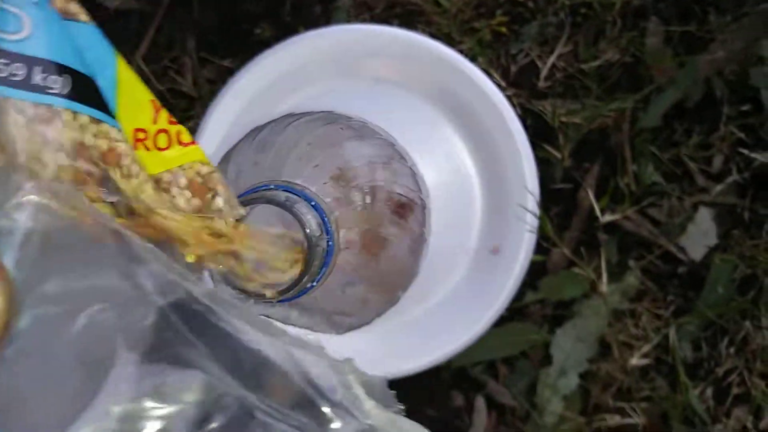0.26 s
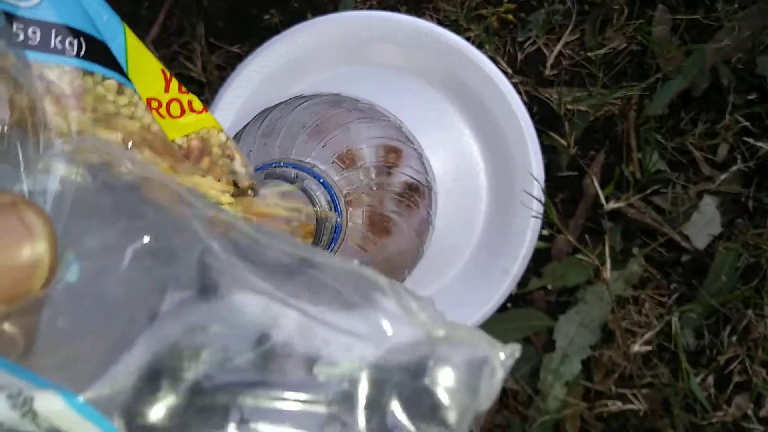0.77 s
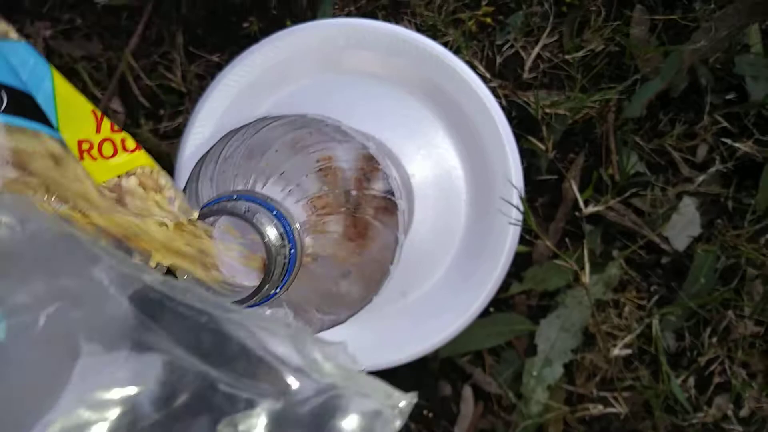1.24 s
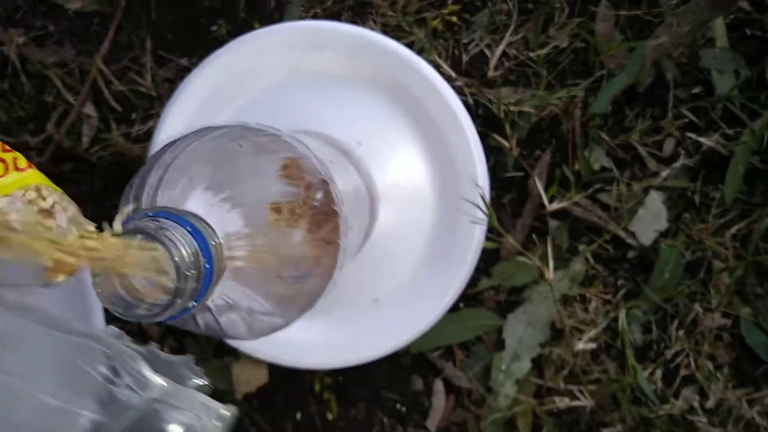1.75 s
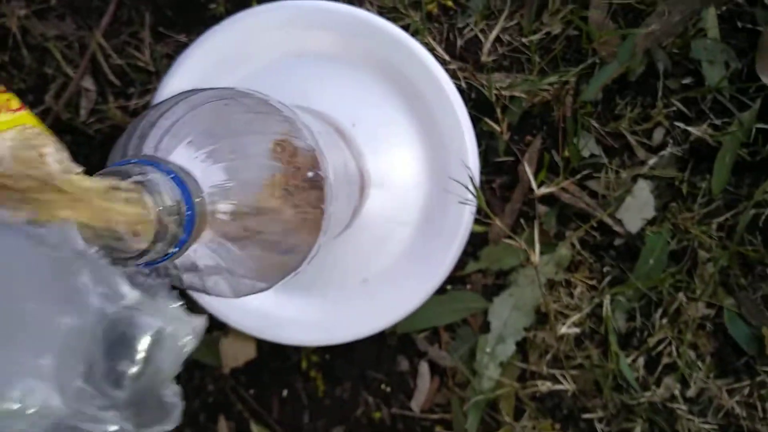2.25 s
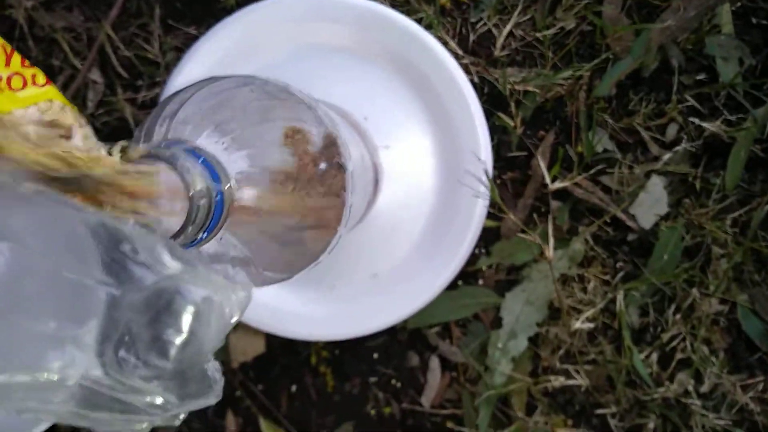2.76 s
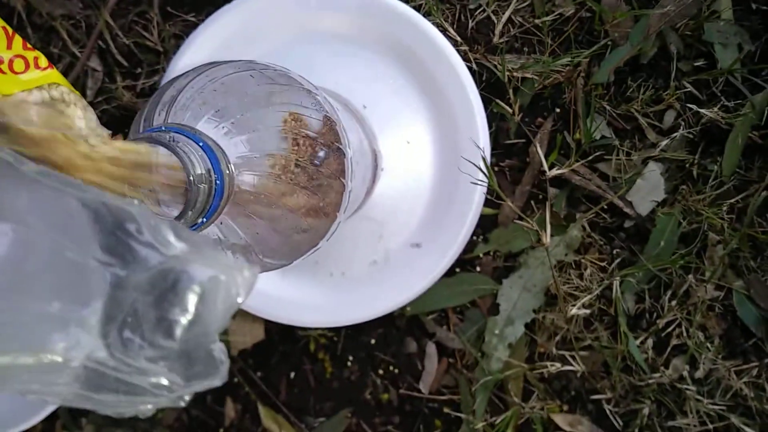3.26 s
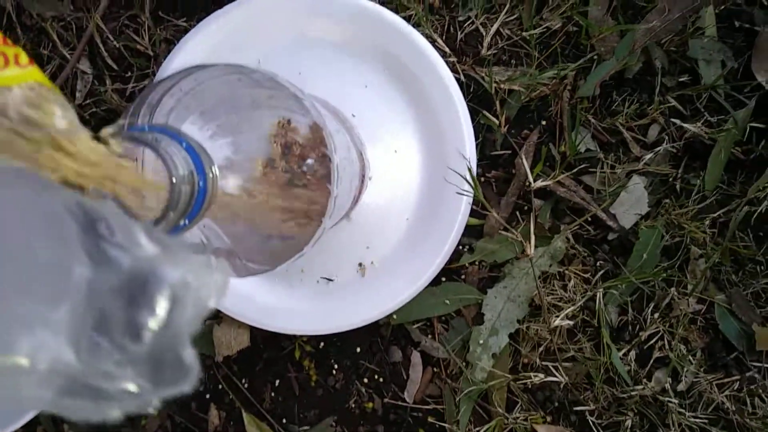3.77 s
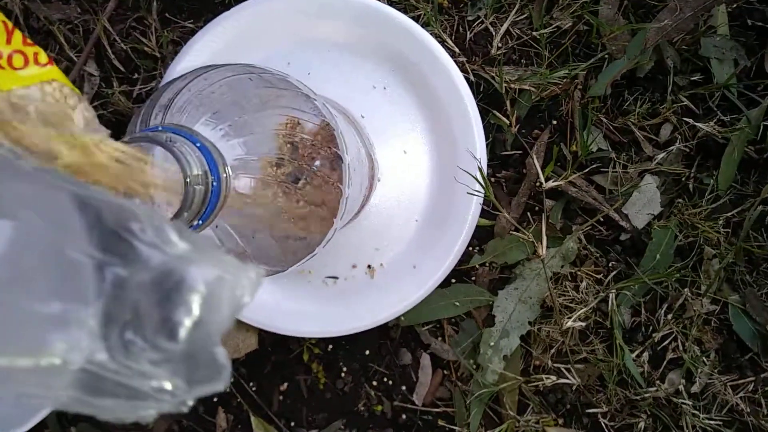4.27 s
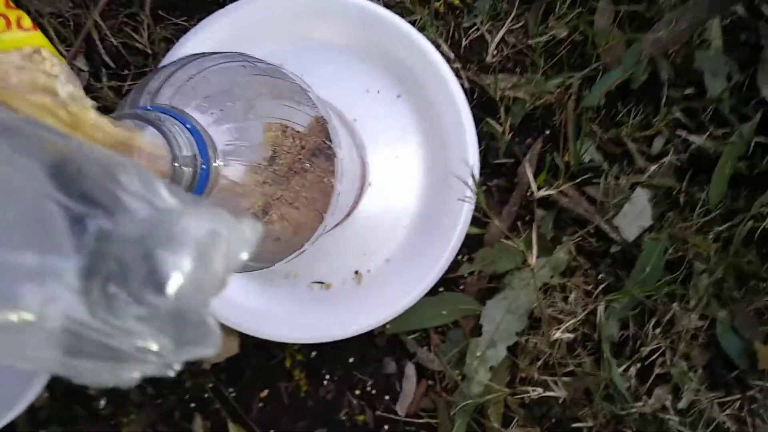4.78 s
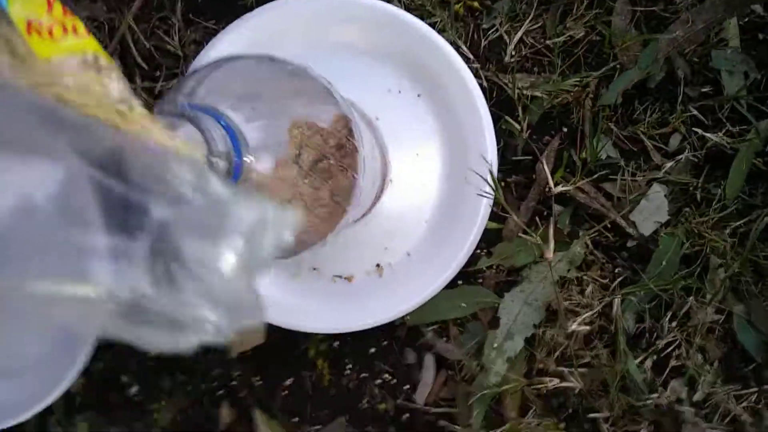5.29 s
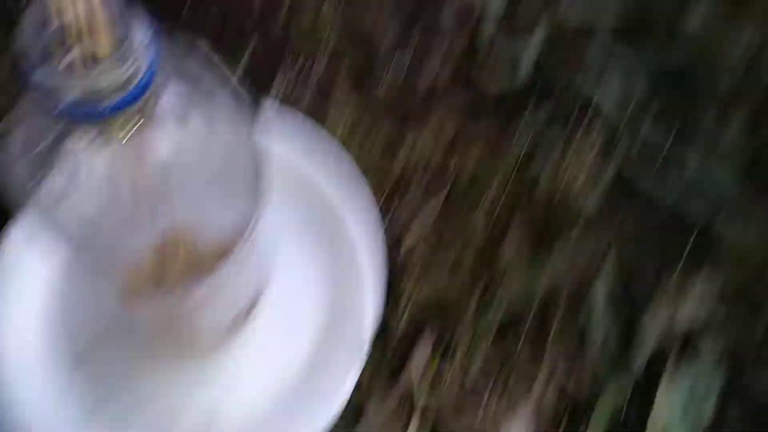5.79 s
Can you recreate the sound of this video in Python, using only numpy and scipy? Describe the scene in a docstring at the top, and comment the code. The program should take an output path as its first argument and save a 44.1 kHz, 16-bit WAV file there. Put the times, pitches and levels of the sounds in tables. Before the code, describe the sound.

Dry birdseed streams into a plastic bottle with a bright, dense, crackling rattle, dulling and thinning as the seed bed deepens outdoors.

```python
"""Outdoors, the microphone close to a plastic bottle as dry birdseed pours in through its neck for six seconds.
From the start, noise bursts coloured by the plastic make the ticking stream, over a bright rustle and a yard background.
Under it a low sine drone wavers far off, and resonances driven by noise make the bottle's air boom softly.
Larger seeds soon stand out, and a hollow knock of decaying sines comes just after one second.
As the bed of seed builds up the ticks dull and thin; throughout, the recorder limits the loudest ones."""
import sys
import numpy as np
from scipy import signal
from scipy.fft import rfft, irfft
from scipy.io import wavfile
from scipy.ndimage import uniform_filter1d, minimum_filter1d

SR = 44100
rng = np.random.default_rng(int(sys.argv[2]) if len(sys.argv) > 2 else 0)


def store_pcm(level_fs):
    """Save levels as 16-bit WAV."""
    pcm = np.round(np.clip(level_fs, -1, 1) * 32767).astype(np.int16)
    wavfile.write(sys.argv[1], SR, np.atleast_2d(pcm).T)


N = 265746  # samples


def gain_of(db):
    """Decibels to gain."""
    return 10 ** (np.asarray(db) / 20)


def evened(x):
    """Scales to rms 1."""
    return x / np.sqrt(np.mean(x ** 2) + 1e-20)


def read(points, hz):
    """Reads a curve over frequency on a log-frequency axis."""
    point_hz, value = np.transpose(points)
    return np.interp(np.log(hz + 1), np.log(point_hz + 1), value)


def columns(rows):
    """Reads each column of a time table at every sample."""
    time_s, *rest = np.transpose(rows)
    return [np.interp(np.arange(N) / SR, time_s, column) for column in rest]


def coloured(points):
    """Steady noise of rms 1 with a given spectrum."""
    spectrum = rfft(rng.standard_normal(N))
    level_db = read(points, np.fft.rfftfreq(N, 1 / SR))
    return evened(irfft(spectrum * gain_of(level_db), N))


def resonate(x, hz, width):
    """Shifts the curve hz down to zero, smooths, and shifts back: a resonance of gain 1."""
    turn = np.exp(2j * np.pi * np.cumsum(hz * np.ones(len(x))) / SR)
    r = np.exp(-np.pi * width / SR)
    return 2 * (turn * signal.lfilter([1 - r], [1, -r], x / turn)).real


def drift(seconds):
    """Slow chance of rms 1 that changes over about this time."""
    width = round(seconds * SR)
    return evened(uniform_filter1d(uniform_filter1d(rng.standard_normal(N), width), width))


# seed bed building up in the bottle: time_s, depth (0-1)
BED_DEPTH = [(0, 0), (1.5, 0.18), (2.5, 0.36), (3.5, 0.67), (4.5, .85), (6.03, 0.89)]


def bed_depth():
    """Depth of the seed bed, which moves the colour of each strike from bare plastic to seed on seed."""
    return columns(BED_DEPTH)[0]


# the stream of small seeds: time_s, level_db
STREAM_LEVEL = [(0, -22), (0.035, -20.5), (0.05, -11.5), (0.65, -13.5), (1.05, -16), (1.3, -13.5),
                (1.6, -16.5), (1.85, -13.5), (2.75, -12.5), (3.1, -12.5), (3.45, -18), (3.9, -15.5),
                (4.1, -20), (4.6, -21.5), (5.1, -23.5), (5.5, -26.5), (6.03, -25)]
# the stream stalls for a moment at the neck: middle_s, length_s, depth_db
STALLS = [(0.108, 0.041, -14), (0.214, 0.0076, -5), (0.742, 0.042, -8), (1.076, 0.048, -9.5),
          (1.137, 0.014, -17), (1.2, 0.014, -10), (1.472, 0.041, -6), (2.126, 0.01, -8.5),
          (2.281, 0.017, -9.5), (2.809, 0.094, -6), (2.972, 0.017, -6.5), (3.128, 0.033, -5.5),
          (3.856, 0.022, -3), (4.76, 0.046, -4), (4.963, 0.019, -6), (5.197, .02, -7), (5.3, 0.023, -3.5),
          (5.455, 0.014, -8)]


def flow_db():
    """Level of the stream, with a smooth dip at each stall."""
    t = np.arange(N) / SR
    dips_db = sum(db * np.exp(-(2 * (t - s) / length) ** 2) for s, length, db in STALLS)
    return columns(STREAM_LEVEL)[0] + dips_db


# colour of seeds on the bare plastic: pitch_hz, level_db (per Hz)
BARE_COLOUR = [(410, -29), (700, -17.5), (777, -18), (1340, -16.5), (1760, -6.5), (2060, -6.5), (3160, 0.5),
               (4260, 2.5), (5740, -9), (6370, -8), (9040, -10.5), (10800, -18), (12800, -22.5),
               (15600, -35.5)]
# colour of seeds on a bed of seed: pitch_hz, level_db (per Hz)
BEDDED_COLOUR = [(410, -64), (700, -28), (1150, -17.5), (1490, -14.5), (1670, -13.5), (1830, -9),
                 (2880, -7.5), (3550, -3), (4200, -1), (5740, -3), (8470, -14), (12300, -38.5),
                 (15600, -48)]
# bottle wall modes: pitch_hz, width_hz, bare_lift_db, bedded_lift_db
WALL_MODES = [(1456, 51, -1.5, 0), (1805, 170, 5.5, -4), (2518, 104, 3.5, -1.5), (3087, 370, 3.5, -0.5),
              (3546, 750, 3.5, 1), (3910, 160, -7, 5.5), (4000, 590, 3.5, -8), (4970, 400, -6.5, 1.5),
              (5220, 1200, 5, -6), (6260, 640, 3.5, -5.5), (7130, 2500, 1, -3.5), (15100, 1900, 16, -3)]
# how long a strike rings: pitch_hz, t60_s
RING_TIME = [(1000, 0.023), (2000, 0.051), (3500, 0.025), (7000, 0.013), (14000, 0.02)]
LENGTH, TICK_AT = 2048, 20  # samples: one strike, and its tick's peak within it


def strikes(bed, low_db, high_db, tick_db=14.0, spot_db=6.0):
    """One strike a row, peak 1: a tick, then a ring of the walls whose decay time depends on pitch."""
    noise = rng.standard_normal((len(bed), LENGTH + len(WALL_MODES)))
    ring, spot = noise[:, :LENGTH], noise[:, LENGTH:]
    crack = ring[:, ::-1]
    band_hz, t, z = signal.stft(ring, SR, nperseg=64)
    decay = gain_of(-60 * t / read(RING_TIME, band_hz)[:, None])
    ring = signal.istft(z * decay, SR, nperseg=64)[1][:, :LENGTH]
    n = np.arange(LENGTH)
    tick = crack * (n >= TICK_AT) * np.exp(-abs(n - TICK_AT) / (0.00045 * SR))  # the husk's brief crack
    ring = ring * np.minimum(n / 27.0, 1) + gain_of(tick_db) * tick  # a soft touch comes just before it

    hz = np.abs(np.fft.fftfreq(2 * LENGTH, 1 / SR))
    bed = np.clip(bed, 0, 1)[:, None]
    db = (1 - bed) * read(BARE_COLOUR, hz) + bed * read(BEDDED_COLOUR, hz)
    thud_band = 1 / (1 + (hz / 1850) ** 6 + (1020 / (hz + 1)) ** 6)
    bright_band = 1 / (1 + (6500 / (hz + 1)) ** 6 + (hz / 13000) ** 3)
    db = db + low_db[:, None] * thud_band + high_db[:, None] * bright_band
    # where the seed lands decides which modes it wakes
    for (mode_hz, width, bare_db, bed_db), luck in zip(WALL_MODES, spot.T):
        lift_db = (1 - bed) * bare_db + bed * bed_db + spot_db * luck[:, None]
        db = db + lift_db / (1 + (2 * (hz - mode_hz) / width) ** 2)
    # causal colour: nothing before the strike begins
    log_gain = signal.hilbert(np.maximum(db, -100) * np.log(10) / 20)
    spectrum = np.fft.fft(ring, 2 * LENGTH) * np.exp(np.conj(log_gain))
    sound = np.fft.ifft(spectrum).real[:, :LENGTH]
    return sound / abs(sound).max(1, keepdims=True)


SEEDS_PER_S, CLUMPING = 420, 0.6  # rate at average clumping; strength of clumping (natural log)
SIZE_SPREAD_DB, PATTER_DB = 1.5, -6  # dB: scale of the chance in seed size; patter against the seeds


def stream(count=32):
    """Many small seeds in loose clumps over a fine even patter; each strike suits the depth of the bed."""
    clumps = evened(uniform_filter1d(uniform_filter1d(rng.standard_normal(N), 250), 250))
    falls = rng.random(N) < SEEDS_PER_S * np.exp(CLUMPING * clumps) / SR
    size_db = SIZE_SPREAD_DB * np.minimum(rng.exponential(1, N), 2.6)
    size = falls * gain_of(size_db) * rng.choice([-1, 1], N)
    patter = rng.standard_normal(N) * (rng.random(N) < 0.15)  # husks and dust, too dense to count
    size = evened(size) + gain_of(PATTER_DB) * evened(patter)

    # strikes run from bare plastic to full bed; each seed picks one near the present depth
    pick = np.round(count * abs(bed_depth() + 0.16 * rng.standard_normal(N)))
    pick = np.clip(pick, 0, count - 1)
    low, high = rng.standard_normal((count, 2)).T
    bank = strikes(np.arange(count) / (count - 1), 2.6 * low, 3.6 * high)
    bank = bank / np.linalg.norm(bank, axis=1, keepdims=True)
    out = sum(signal.oaconvolve(size * (pick == k), strike)[:N] for k, strike in enumerate(bank))
    return gain_of(flow_db()) * evened(out)


def rustle(seeds):
    """Husks brushing past each other: a thin bright hiss that flickers and swells with the ticks."""
    busy = np.sqrt(abs(uniform_filter1d(seeds ** 2, size=130)))
    flicker = gain_of(-26.0 + 2.6 * drift(0.007))
    # pitch_hz, level_db (per Hz)
    hiss = coloured([(3000, -5), (7000, -24), (11000, -18), (13000, -10), (15000, 0.0)])
    return flicker * busy * hiss


# colour of the outdoor background: pitch_hz, level_db (per Hz)
YARD_COLOUR = [(88, -42), (150, -20), (210, -24), (292, -38), (429, -3.5), (567, 0), (655, -6), (1500, 8.5),
               (1950, -49), (3300, -120)]
# outdoor background: time_s, level_db
YARD_SWELL = [(0, -39.5), (0.45, -41), (1.2, -43), (3.1, -37.5), (3.9, -36.5), (4.5, -45), (5.25, -51),
              (5.5, -59), (5.75, -48), (6.03, -39)]


def yard():
    """The outdoor background: noise of a fixed colour that rises and falls in level."""
    return gain_of(columns(YARD_SWELL)[0]) * coloured(YARD_COLOUR)


# far drone: time_s, pitch_hz, tone_db, rumble_db
FAR_DRONE = [(0, 73.7, -42, -46), (0.47, 75.2, -35, -40), (1.14, 76.3, -45, -42), (1.27, 77.1, -56, -49),
             (1.66, 77.8, -67, -54), (1.76, 71.1, -46, -50), (2.01, 68.8, -35, -40),
             (2.18, 70, -47.5, -45.5), (2.7, 74.4, -48.5, -42), (3.3, 71.8, -46.5, -48.5),
             (3.6, 70.6, -64, -51), (3.94, 78, -45.5, -49), (4.13, 80, -75, -62), (4.28, 80, -49, -45.5),
             (4.77, 74.9, -50.5, -41), (4.86, 72.6, -61, -65), (5.0, 71.5, -43.5, -46),
             (5.36, 70.2, -60, -56), (5.5, 69.8, -46.5, -51), (6.03, 73, -57, -55)]
# colour of the rumble under it: pitch_hz, level_db (per Hz)
RUMBLE_COLOUR = [(15, -47), (25, -11), (40, -5), (59, -0.5), (75, 6), (123, 4), (165, -4), (195, -16),
                 (260, -26), (340, -39), (570, -120)]
DRONE_WAVER_DB, DRONE_WAVER_HZ = 4.0, 2.77  # rms waver of level and pitch where the tone is faint
OCTAVE_DB = -18  # dB, the drone's octave against its tone


def drone():
    """A far low tone, steady when loud and wavering when faint, over a rumble that comes and goes."""
    hz, tone_db, rumble_db = columns(FAR_DRONE)
    faint = np.clip((-39.0 - tone_db) / 8.2, 0, 1)
    turn = 2 * np.pi * np.cumsum(hz + faint * DRONE_WAVER_HZ * drift(0.071)) / SR
    tone = np.sqrt(2) * (np.sin(turn) + gain_of(OCTAVE_DB) * np.sin(2 * turn))
    tone_gain = gain_of(tone_db + faint * DRONE_WAVER_DB * drift(0.05))
    return tone_gain * tone + gain_of(rumble_db) * coloured(RUMBLE_COLOUR)


# air in the bottle: time_s, neck_db, overtone_db
AIR_LEVEL = [(0, -73, -45.5), (0.35, -48.5, -42.5), (1.05, -63, -53.5), (2.2, -50, -51), (3.15, -49, -56),
             (4.4, -47.5, -50.5), (4.6, -60.5, -56), (5.25, -55.5, -55.5), (5.5, -77, -67), (5.8, -57, -54),
             (6.03, -54, -60)]
# first overtone of that air: time_s, pitch_hz
OVERTONE_PITCH = [(0, 693), (1.5, 594), (3, 580), (6.03, 575.3)]
NECK_HZ, NECK_WIDTH, OVERTONE_WIDTH = 304, 42, 82  # Hz; widths of the narrower of two resonances in a row
AIR_PUFFS_DB = 2  # dB rms


def bottle_air():
    """The falling stream stirs the air column in puffs: noise through resonances gives two fuzzy low tones."""
    neck_db, over_db = columns(AIR_LEVEL)
    over_hz = columns(OVERTONE_PITCH)[0]
    neck = resonate(rng.standard_normal(N), NECK_HZ, NECK_WIDTH)
    neck = resonate(neck, NECK_HZ, 3 * NECK_WIDTH)
    over = resonate(rng.standard_normal(N), over_hz, OVERTONE_WIDTH)
    over = resonate(over, over_hz, 3 * OVERTONE_WIDTH)
    tones = gain_of(neck_db) * evened(neck) + gain_of(over_db) * evened(over)
    return gain_of(AIR_PUFFS_DB * drift(0.086)) * tones


# the clearest seeds: tick_s, peak_db, extra_thud_db, extra_brightness_db
CLEAREST_SEEDS = [(0.0458, 2, 7, 6), (0.075, 15, -18, 2), (0.1062, 10.5, -11, -2), (0.116, 2, -12, -2),
                  (0.1358, 3, -16, 6), (0.1496, 5, -14, 3), (0.2017, -12, -5, 0.1), (0.2783, 4, 6, -4),
                  (0.3578, 7, 3, 0.1), (0.4408, 5, -6, -7), (0.649, -12, 0.1, 0.1), (0.7307, 10, -2, 9),
                  (0.7591, -3, 0.1, 10), (0.7687, 16, -3, 13), (0.7941, -1, 12, -4), (0.846, 6, 7, -2),
                  (0.8849, 12, 14, 0.1), (0.9131, -2, 7, 2), (0.9592, -6, -4, -3), (0.9926, -2, -4, -4),
                  (1.001, 5, 4, 0.1), (1.058, 4, 0.1, 0.1), (1.083, 4, -9, -7), (1.109, -4, 0.1, -7),
                  (1.1198, 10, 8, -8), (1.1555, -6, 5, 14), (1.183, 15, -6, 19), (1.2094, 0, 5, 3),
                  (1.2404, 4, 5, 0.1), (1.2875, -9, 0.1, 0.1), (1.3015, -5, 2, -5), (1.3299, -14, 0.1, -2),
                  (1.3448, 0, -11, 19), (1.419, 0, 0.1, 5), (1.4636, -7, 3, 9), (1.488, -8, 0.1, 0.1),
                  (1.508, -10, 0.1, 0.1), (1.5266, 15, -3, 0.1), (1.5724, 11, 0.1, 12), (1.599, 3, -2, 0.1),
                  (1.621, -11, -12, -6), (1.6492, -21, -4, -3), (1.6675, 9, -10, 3), (1.697, 7, 3, 7),
                  (1.728, -11, -10, 4), (1.7433, 1, -2, 0.1), (1.7515, 6, 0.1, 0.1), (1.816, 10, 0.1, 0.1),
                  (1.843, 15, -8, 0.1), (1.9096, 6, -4, 3), (1.9689, 0, -6, 0.1), (1.9984, -16, 2, 0.1),
                  (2.0105, 6, 2, -6), (2.0358, -5, 14, -7), (2.055, 4, 6, -6), (2.0635, 7, 0.1, -4),
                  (2.1323, -3, 0.1, -4), (2.146, 7, 19, -14), (2.2341, 8, 12, -10), (2.292, 4, 2, -13),
                  (2.314, -5, 0.1, 0.1), (2.4144, 4, -10, 3), (2.4452, 5, -2, 3), (2.4937, 3, -7, 8),
                  (2.5127, 16, -6, 0.1), (2.553, 5, 0.1, 0.1), (2.595, 2, -6, 0.1), (2.7097, -3, -6, 3),
                  (2.7549, 3, -10, 0.1), (2.801, 4, -11, 5), (2.812, 5, -9, 9), (2.8374, 3, -7, 0.1),
                  (2.8917, -14, -4, 3), (2.9866, 3, 3, 5), (3.1486, 0, 23, -11), (3.219, -9, 0.1, 2),
                  (3.261, 12, 0.1, 24), (3.333, -10, 0.1, 11), (3.422, -16, -3, 6), (3.4615, 3.5, 2, 8),
                  (3.6247, 10, 12, 0.1), (3.663, -4, 13, -3), (3.689, -7, 3, 4), (3.7628, 7, 12, -5),
                  (3.863, 11, 7, 4), (3.9604, -11, 10, -4), (3.982, -19, 0.1, 0.1), (4.0028, -20, -7, 0.1),
                  (4.0223, -21, -4, -9), (4.0447, -10, 8, -12), (4.0642, -6, 13, -12), (4.1096, -6, 12, 2),
                  (4.1756, -2.5, 15, -12), (4.2138, -3.5, 17, -8), (4.2419, 5, 2, 3), (4.278, -12, 0.1, -7),
                  (4.314, 14, -4, 13), (4.373, -4, 4, -4), (4.437, -2, -8, 21), (4.5077, -12, 5, -5),
                  (4.5188, -4.5, -1, -7), (4.5456, -7, 6, -4), (4.559, 10, -12, 12), (4.6718, -16, -15, 7),
                  (4.7007, -8, 0.1, 0.1), (4.8309, 10.5, 7, 6), (4.851, 0, 5, -7), (4.8726, -6, 0.1, 0.1),
                  (4.8862, -5, -13, 7), (4.9282, -5.5, 14, 0.1), (4.9816, -1, -2, 10), (5.029, 1, 17, 8),
                  (5.1457, -8, -11, 6), (5.1754, 9, -13, -4), (5.2058, 5, -19, 2), (5.2322, -16, 4, 0.1),
                  (5.2559, 7, -24, 11), (5.31, -6, -5, 6), (5.3221, 4, -26, 5), (5.461, -3.5, -11, 21),
                  (5.5127, -2.5, -13, 2), (5.6, -15, -4, -18), (5.616, -7, -6, -27),
                  (5.6376, -13.5, -9, -2), (5.672, -19, -7, 0.1), (5.7083, -7, -19, -8),
                  (5.8284, 3, -24, 0.1), (5.8586, -7, 0.1, -6), (5.913, -17, -9, -14),
                  (5.9535, -7, 0.1, 0.1)]
# larger seeds at chance moments, in dB: peak above the stream, its scatter, scatter of thud and of brightness
LARGE_DB, LARGE_SCATTER_DB, THUD_SCATTER_DB, BRIGHT_SCATTER_DB = 13.5, 3.5, 4, 3.5


def clear_seeds(count=90):
    """The larger seeds that stand out of the stream: the listed ones, and others at chance moments."""
    tick_s, peak_db, low_db, high_db = np.transpose(CLEAREST_SEEDS)
    when = rng.integers(0, N, count)
    size, low, high = rng.standard_normal((count, 3)).T
    at = np.append(np.round(tick_s * SR).astype(int) - TICK_AT, when)
    chance_db = flow_db()[when] + LARGE_DB + LARGE_SCATTER_DB * np.minimum(size, 1)
    peak_db = np.append(peak_db, chance_db)
    low_db = np.append(low_db, THUD_SCATTER_DB * low)
    high_db = np.append(high_db, BRIGHT_SCATTER_DB * high)
    sounds = strikes(bed_depth()[at], low_db, high_db, tick_db=16.5, spot_db=3.5)
    sounds = sounds * gain_of(peak_db)[:, None]
    out = np.zeros(N + LENGTH)
    np.add.at(out, at[:, None] + np.arange(LENGTH), sounds)
    return out[:N]


KNOCK_S = 1.0988  # s
# low modes of the knocked bottle: pitch_hz, level_db, t60_s
KNOCK_MODES = [(1270, -8, 0.012), (645, -31, .014)]


def knock():
    """One hollow knock on the bottle: low modes that die at once."""
    t = np.maximum(np.arange(N) / SR - KNOCK_S, 0)
    rise = 1 - np.exp(-t / 0.00031)
    modes = sum(gain_of(db - 60 * t / t60) * np.sin(2 * np.pi * hz * t) for hz, db, t60 in KNOCK_MODES)
    return rise * modes


def scene():
    """All sources at one microphone."""
    seeds = stream() + clear_seeds()
    seeds = seeds + knock() + rustle(seeds)
    return (seeds + bottle_air() + drone() + yard())[None]


CEILING_DB, EDGE_HZ = -1.1, 15780  # limiter ceiling (dB of full scale), top of the recorded band (Hz)
# past the knee, the overdriven microphone gives less on one swing than the other
LOPSIDED, KNEE = 0.56, 0.58  # share of the excess taken away, amplitude


def record(dry):
    """A quick limiter turns down around the loudest ticks, which also thump faintly; then the band limit."""
    room_db = np.minimum(CEILING_DB - 20 * np.log10(abs(dry) + 1e-9), 0)
    turn_down_db = uniform_filter1d(minimum_filter1d(room_db, size=81), size=41)
    limited = dry * gain_of(turn_down_db)
    thump = uniform_filter1d(np.maximum(limited - KNEE, 0), size=40)
    limited = limited - LOPSIDED * (thump - uniform_filter1d(thump, size=300))
    band = signal.firwin(1023, EDGE_HZ, window=("kaiser", 9), fs=SR)
    return signal.oaconvolve(limited, band[None], "same")


dry = scene()
out = record(dry)
store_pcm(out)
```